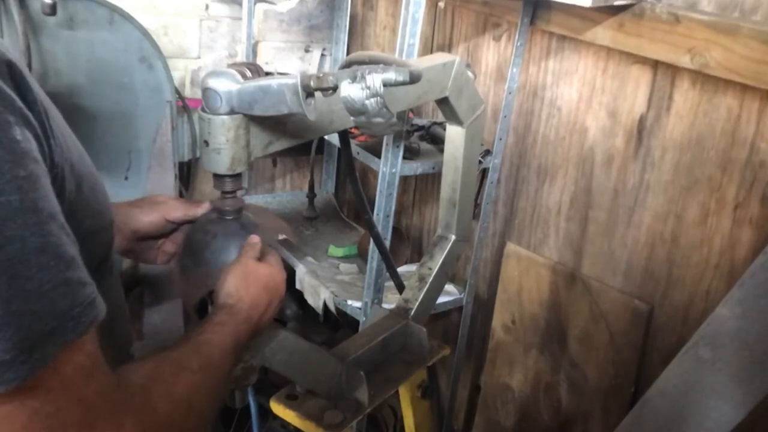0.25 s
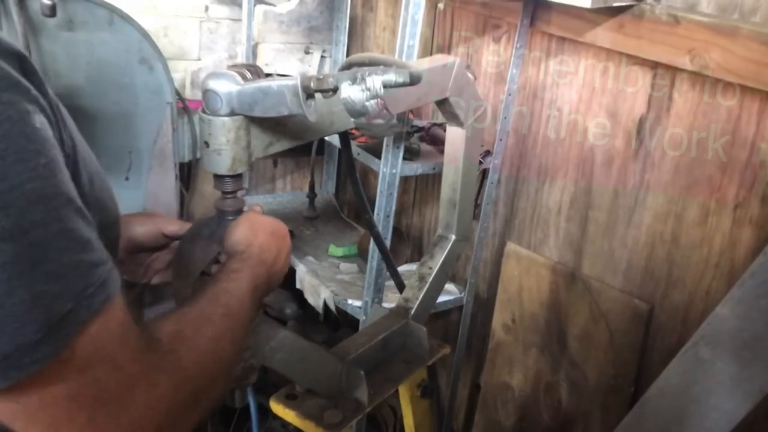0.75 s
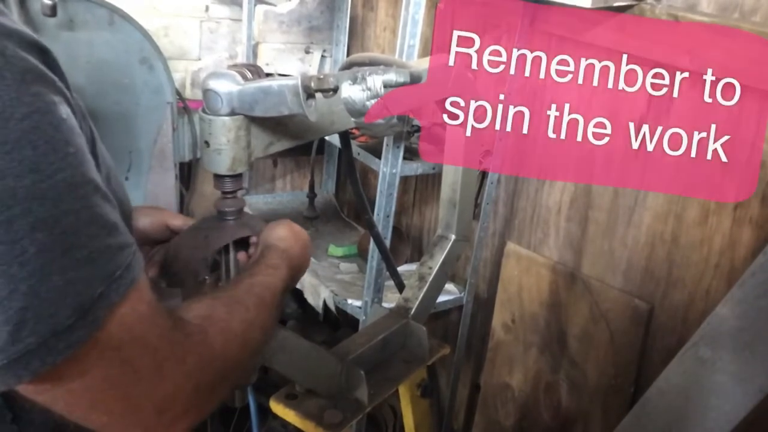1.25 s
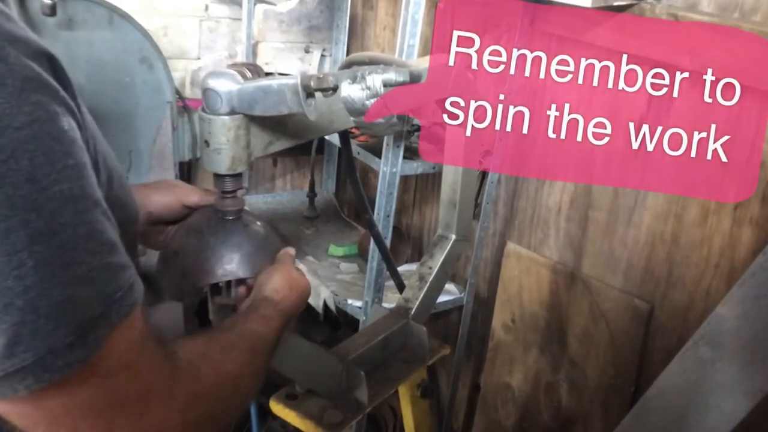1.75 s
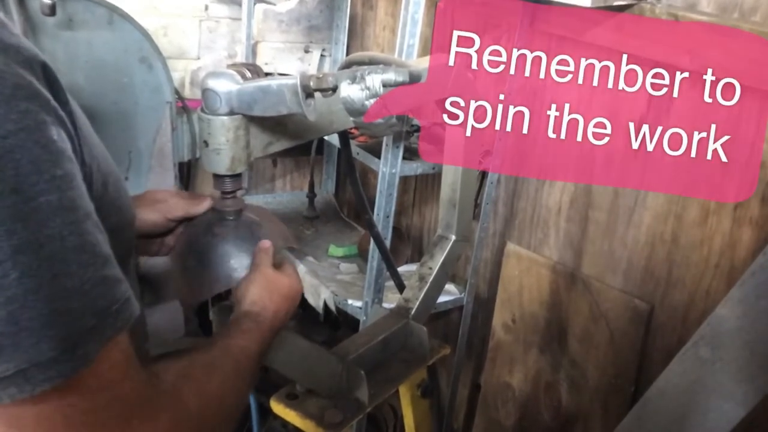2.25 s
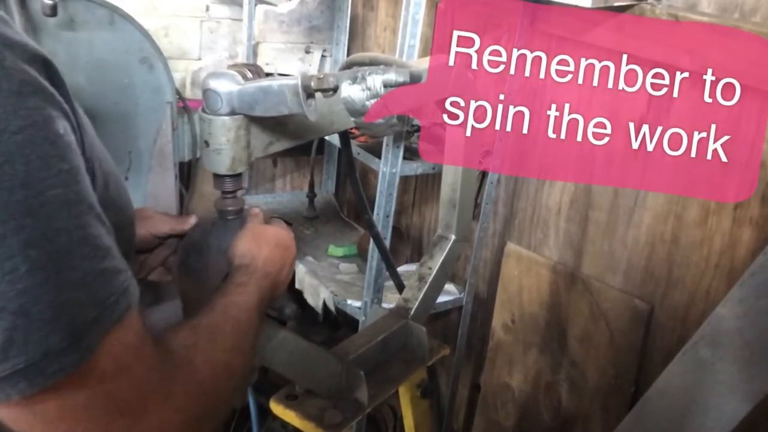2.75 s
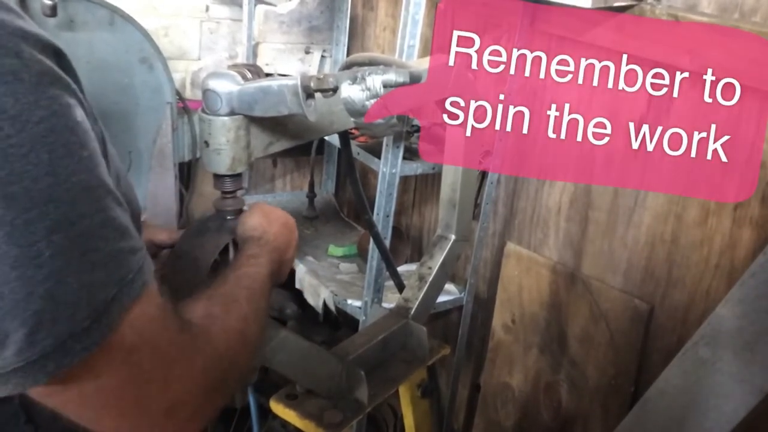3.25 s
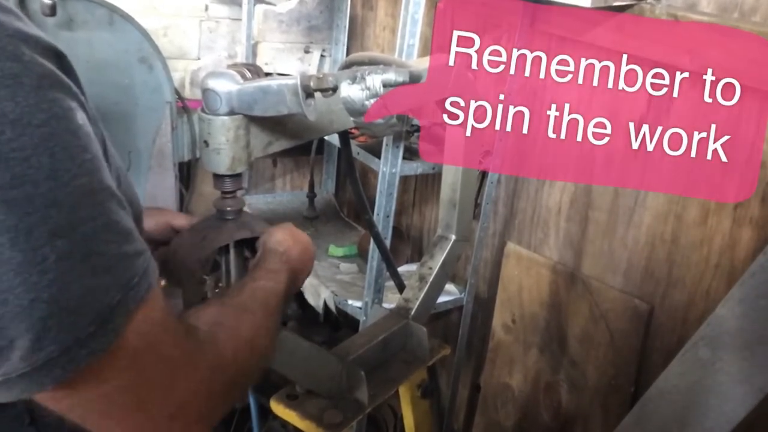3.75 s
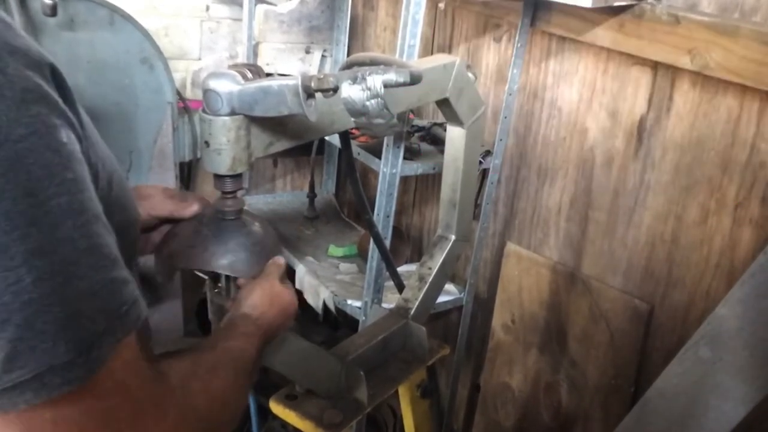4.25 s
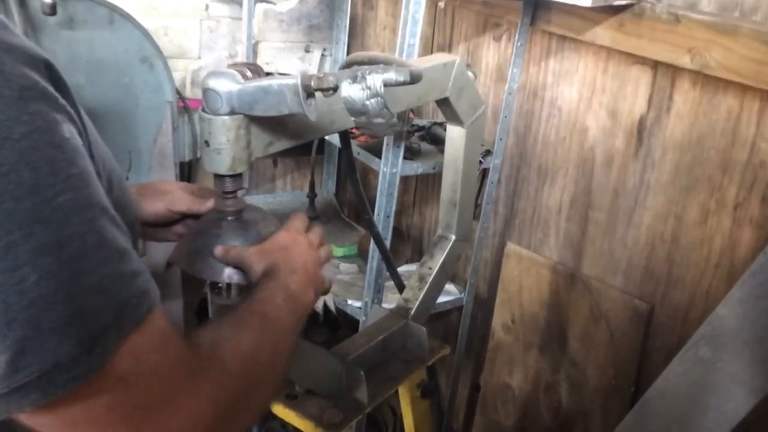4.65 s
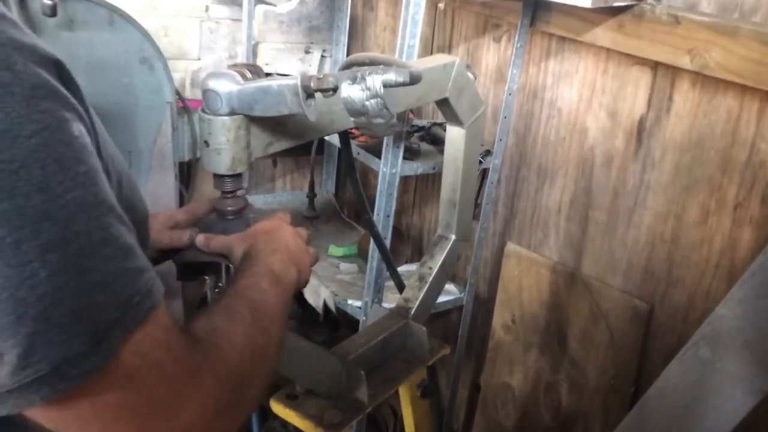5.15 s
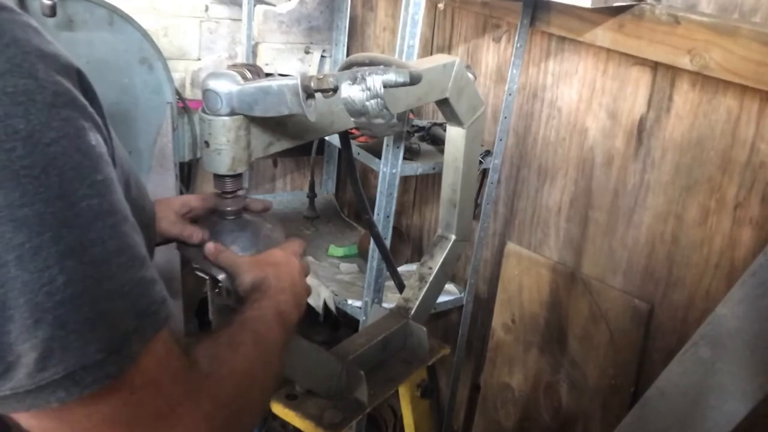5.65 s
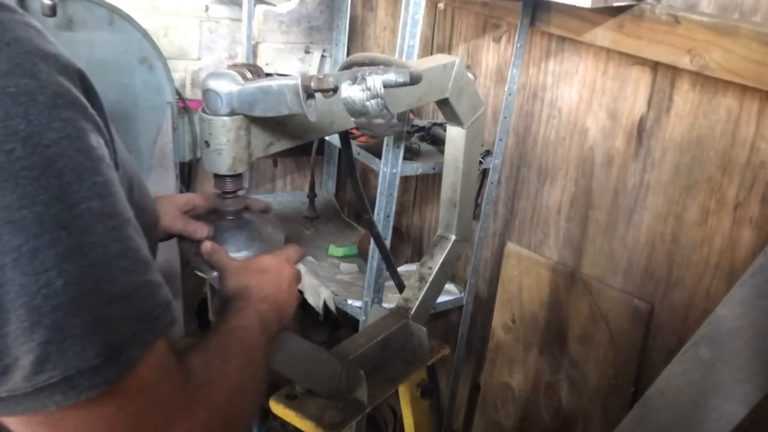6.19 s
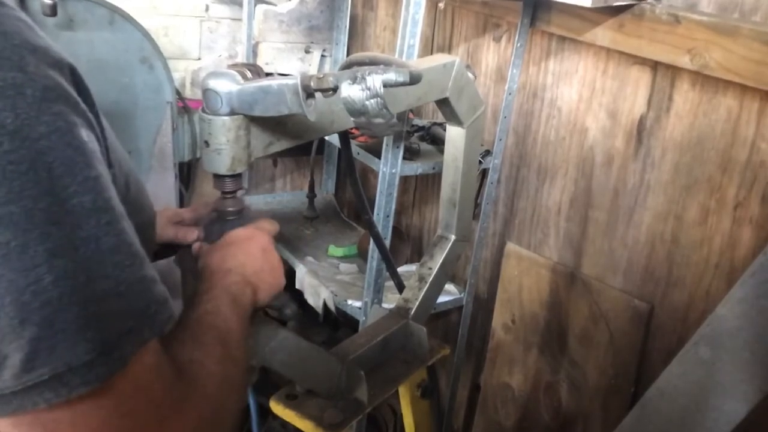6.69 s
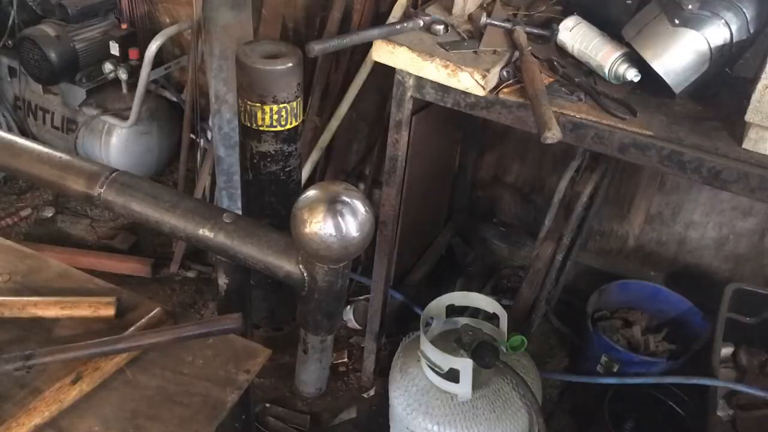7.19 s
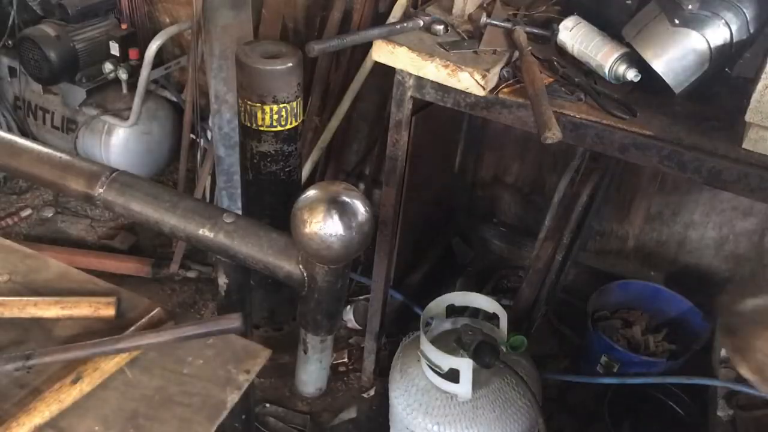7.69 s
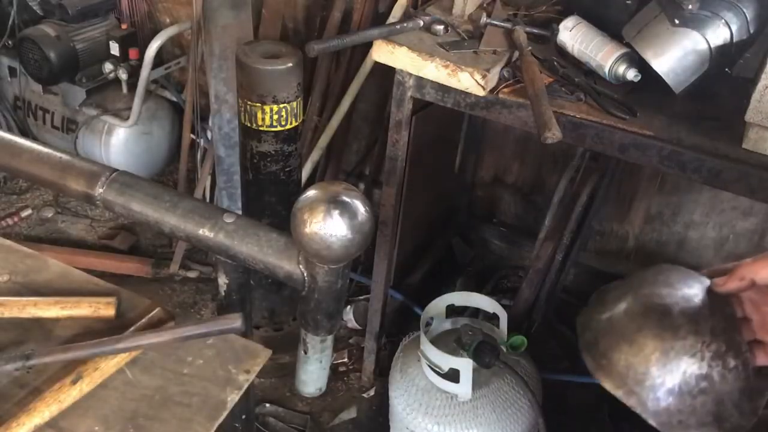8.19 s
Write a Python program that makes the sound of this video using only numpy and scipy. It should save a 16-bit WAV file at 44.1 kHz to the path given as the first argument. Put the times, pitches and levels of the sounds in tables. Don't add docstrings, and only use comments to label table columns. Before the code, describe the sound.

Close, slightly overloaded sound of rapid steel-on-steel hammering, nearly a continuous buzz, with bright ringing, piercing high rattle and irregular hollow thumps as the work is turned. A piston compressor rumbles underneath, and short wooden-shed reflections surround it. The racket ends with a hard cut; a much quieter shed follows, with faint leaking air, soft thuds and scuffs of feet, a small clink and light knocks on metal.

```python
import sys
import numpy as np
from scipy import signal
from scipy.fft import rfft, irfft, next_fast_len
from scipy.io import wavfile
from scipy.ndimage import uniform_filter1d, map_coordinates

SR = 44100
rng = np.random.default_rng(int(sys.argv[2]) if len(sys.argv) > 2 else 0)


def volts_from_db(level):
    exponent = np.asarray(level, float) / 20
    return 10 ** exponent


def materialize(psi):
    bounded = np.clip(np.atleast_2d(psi).T, -1, 1)
    quanta = np.round(bounded * 32767).astype(np.int16)
    wavfile.write(sys.argv[1], SR, quanta)


N = 371755


def unit(x):
    return x / np.sqrt(np.mean(x ** 2, axis=-1, keepdims=True) + 1e-20)


def along(points, hz):
    f, v = np.transpose(points)
    return np.interp(np.log(hz + 1), np.log(f + 1), v)


def curves(rows, s):
    knots, *cols = np.transpose(rows)
    return [np.interp(s, knots, c) for c in cols]


def wobble(rate):
    knots = rng.standard_normal(int(N * rate / SR) + 4)
    return map_coordinates(knots, [np.arange(N) * rate / SR])


def filtered(x, response):
    m = next_fast_len(x.shape[-1] + 8192)
    spectrum = rfft(x, m) * response(np.fft.rfftfreq(m, 1 / SR))
    return irfft(spectrum, m)[..., :x.shape[-1]]


def band(lo_hz, hi_hz):
    return lambda f: 1 / (1 + (lo_hz / (f + 1)) ** 4) / (1 + (f / hi_hz) ** 4)


def laid(rows, s):
    at = SR + np.round(np.asarray(s) * SR).astype(int)[:, None] + np.arange(rows.shape[1])
    return np.bincount(at.ravel(), rows.ravel(), N + 2 * SR)[SR:SR + N]


def rings(modes, part_db, t, scatter_db, wander):
    out = 0
    for hz, width_hz, db in modes:
        size, bend, phase = rng.standard_normal((len(part_db), 3, 1)).transpose(1, 0, 2)
        swing = np.sin(2 * np.pi * (hz * (1 + wander * bend) * t + phase))
        strength = volts_from_db(db + part_db[:, None] + scatter_db * size)
        out = out + strength * swing * np.exp(-np.pi * width_hz * t)
    return out


# first blow in seconds, that blow in dB, the blows after it in dB.
GRIP_CHANGES = [(-0.0026, -9.5, -15), (0.1567, -11.5, -13), (0.3377, -14, -14.5), (0.5241, -10.5, -14.5),
                (0.766, -11, -12.5), (1.0506, -11.5, -11), (1.2934, -9.5, -14), (1.5046, -10, -15),
                (1.668, -7.5, -13.5), (1.8654, -20, -13.5), (2.0343, -8, -13.5), (2.3036, -14.5, -13.5),
                (2.4706, -12, -13.5), (2.7418, -12, -12), (3.1493, -12, -11), (3.3872, -12.5, -11.5),
                (3.5898, -11.5, -13.5), (3.76, -10.5, -12), (3.9356, -9.5, -12.5), (4.143, -12, -12.5),
                (4.3617, -12.5, -14.5), (4.6477, -13.5, -13.5), (4.9155, -9.5, -14.5), (5.212, -12, -12.5),
                (5.5022, -14, -13), (5.8524, -12.5, -14.5), (6.036, -20, -13.5), (6.2513, -13.5, -12.5),
                (6.5351, -12, -18), (6.7031, -14, -12)]
# time in
# seconds, loss in dB.
SLIPPED_BLOWS = [(0.1, 4), (0.549, 5.5), (1.025, 7), (1.478, 4), (1.643, 6.5), (1.95, 4.5), (2.275, 4.5),
                 (3.095, 4), (3.359, 6), (3.6215, 4), (3.679, 2), (3.885, 5), (4.199, 3), (4.412, 5),
                 (4.73, 1.5), (4.836, 4), (4.863, 8), (5.261, 4.5), (5.476, 11.5), (5.582, 6), (5.636, 2),
                 (5.742, 4.5), (5.823, 5), (6.063, 8), (6.836, -3), (6.915, 1), (6.946, -4), (6.968, 8),
                 (6.991, 4), (7.016, 7)]


def blows():
    stroke_s = .0266
    scatter_db, rebound = 1.3, .6
    late_per_db, uneven = .012, .03
    last_blow = (7.048, -23, -23)
    first_s, first_db, rest_db = np.transpose(GRIP_CHANGES + [last_blow])
    first = np.append(0, np.cumsum(np.round(np.diff(first_s) / stroke_s))).astype(int)
    k = np.arange(first[-1] + 1)
    luck, pace = rng.standard_normal((len(k), 2)).T
    off_db = scatter_db * (luck - rebound * np.roll(luck, 1))
    even_s = np.interp(k, first, first_s)
    for s, loss_db in SLIPPED_BLOWS:
        off_db[np.abs(even_s - s).argmin()] = -loss_db
    usual_db = rest_db[np.searchsorted(first, k, side="right") - 1]
    off_db[first] = first_db - rest_db
    travel = np.cumsum(1 - late_per_db * off_db + uneven * pace)
    return np.interp(travel, travel[first], first_s), usual_db + off_db


# time in seconds, die in dB, crown in dB, piston in dB.
TURNING = [(0.0, -7.5, 5, 0.5), (0.54, -5.5, -9.5, 6.5), (0.81, -0.5, -3, 2.5), (1.08, -0.5, -3, 7),
           (1.62, -6, 2.5, 5), (2.16, -8.5, 3.5, -1.5), (2.43, -10, -0.3, 4), (2.7, -8.5, -7, 10.5),
           (2.97, -3.5, 2.5, -4.5), (3.24, -0.5, 4, -2.5), (3.6, -3, 3, -0.5), (4.05, -7, 5.5, 8),
           (4.4, -6, 2, 1), (4.86, -5.5, 6, 2.5), (5.4, -3, -10, 4.5), (5.94, -5, -2.5, -5),
           (6.48, -9, 0.5, 0.5), (7.02, -7.5, 5, 1.5)]
# frequency in Hz, width in Hz, level in dB.
SHELL_MODES = [(2920, 57, 2), (3260, 35, 0.5), (4430, 61, 5), (4660, 55, 1.5)]
# frequency in Hz, width in Hz, level in dB.
DIE_MODES = [(6405, 40, 6), (6443, 30, 10), (6485, 40, 5)]
# frequency in Hz, width in Hz, level in dB.
CROWN_MODES = [(7730, 50, 0), (8430, 50, 1), (8670, 50, 2), (8850, 40, 5)]
# frequency in Hz, width in Hz, level in dB.
PISTON_MODES = [(14730, 50, 6), (14812, 24, 13), (14900, 50, 7)]
# centre in seconds, half length in seconds,
# frequency in Hz, level in dB.
LOOSE_PATCHES = [
    (2.995, .055, 2320, 13),
    (3.2, .15, 1860, 8),
    (3.17, .12, 2840, 9),
    (3.9, .05, 1100, 8),
    (5.34, .035, 4750, 7),
    (5.665, .015, 2330, 9),
    (5.665, .015, 3450, 5),
    (6.885, .07, 8850, 13),
]
# frequency in Hz, density in dB per Hz.
RATTLE_SPECTRUM = [(290, -23), (500, -10), (1090, -6), (1660, -6), (5120, -8.5), (6470, -2), (7380, -7.5),
                   (10500, -9), (14900, -4), (15800, 4.5), (16500, -40.5)]


def clang(s, clang_db):
    t = np.arange(2048) / SR
    die_db, crown_db, piston_db = curves(TURNING, s)
    steel = rings(SHELL_MODES, 0 * s - 4, t, scatter_db=4.0, wander=.012)
    steel += rings(CROWN_MODES, crown_db, t, scatter_db=4.5, wander=.01)
    steel += rings(DIE_MODES, die_db, t, scatter_db=7.5, wander=0.0036)
    piston_db = piston_db - 2 + 1.8 * rng.standard_normal(len(s))
    piston = rings(PISTON_MODES, piston_db, t, scatter_db=5, wander=0.0011)
    for at, half, hz, db in LOOSE_PATCHES:
        patch_db = -12 * ((s - at) / half) ** 4
        steel += rings([(hz, 45, db)], patch_db, t, scatter_db=2.5, wander=0.002)
    jitter = rng.standard_normal((2,) + steel.shape)
    chatter, rebound = unit(uniform_filter1d(jitter, size=130))
    luck = rng.standard_normal((len(s), 3, 1)).transpose(1, 0, 2)
    ring_rise = 1 - np.exp(-t / (.0005 * np.exp(.9 * luck[0])))
    steel = (steel * volts_from_db(2.5 * chatter) + piston * volts_from_db(3 * rebound)) * ring_rise
    rattle_rise = 1 - np.exp(-t / (.0003 * np.exp(.9 * luck[1])))
    rattle = rng.standard_normal(steel.shape) * volts_from_db(1.3 * chatter) * rattle_rise * volts_from_db(-60 * t / 0.16)
    tint = unit(uniform_filter1d(rng.standard_normal((len(s), 64)), size=7))
    colour = lambda f: volts_from_db(along(RATTLE_SPECTRUM, f) + 2.76 * tint[:, (f * 126 / SR).astype(int)])
    blow = unit(steel.ravel()).reshape(steel.shape) + volts_from_db(0.5) * unit(filtered(rattle, colour))
    reseat_s = 0.012 + 0.001 * luck[2]
    blow *= 1 - 0.58 / (1 + np.exp((reseat_s - t) / 0.00079))
    blow /= np.sqrt(np.mean(blow[:, :800] ** 2, axis=1, keepdims=True))
    return laid(volts_from_db(clang_db - 3.0)[:, None] * blow, s)


def tick(s):
    t = np.arange(1024) / SR
    crack = unit(filtered(rng.standard_normal((len(s), len(t))), band(11500, 17000)))
    size_db = -24.5 + 3 * rng.standard_normal((len(s), 1))
    return laid(volts_from_db(size_db - 60 * t / .05) * crack, s)


# first blow in seconds, last blow in seconds,
# thump peak in dB, one blow in so many that finds the dome lifted.
FLAT_STRETCHES = [(0.1, 0.16, -5.5, 2), (0.205, 0.52, -7, 4), (1.13, 1.24, -5, 4), (1.32, 1.48, -3.5, 2),
                  (1.59, 1.59, -8, 2), (1.745, 1.745, -2, 2), (1.92, 1.92, -8.5, 2),
                  (2.035, 2.245, -5.5, 3), (2.305, 2.84, -7.5, 30), (2.415, 2.525, -6, 2),
                  (2.55, 2.635, -5.5, 3), (2.66, 2.72, -9, 30), (3.86, 3.89, -10.5, 30),
                  (4.09, 4.145, -6.5, 2), (4.225, 4.36, -4.5, 3), (4.41, 4.49, -5, 30),
                  (4.57, 4.57, -5.5, 2), (4.65, 4.705, -4, 2), (4.915, 5.61, -3.5, 14),
                  (5.85, 5.905, -3.5, 30), (6.035, 6.09, -2, 30), (6.14, 6.25, -6, 2),
                  (6.38, 6.46, -6.5, 2), (6.457, 6.595, -4.5, 2), (6.70, 6.70, -6, 2),
                  (6.81, 6.81, -12.5, 2), (6.965, 7.05, -5.5, 30)]


def flat_blows(s):
    peak_db = np.full(len(s), np.nan)
    for first_s, last_s, db, lifted in FLAT_STRETCHES:
        first, last = np.abs(s - first_s).argmin(), np.abs(s - last_s).argmin()
        k = np.arange(first, last + 1)
        peak_db[k[(k - first + 1) % round(lifted) > 0]] = db
    peak_db += 1.3 * rng.standard_normal(len(s))
    flat = ~np.isnan(peak_db)
    return s[flat], peak_db[flat]


# delay in ms, signed share of the direct shove.
WALL_ECHOES = [(1.36, -0.12), (2.13, 0.19), (3.08, -0.28), (3.65, 0.11), (5.83, -0.17), (9.32, 0.16),
               (11.09, 0.39), (13.22, -0.21), (14.56, 0.25), (15.26, -0.16), (16.39, -0.12), (20.93, 0.16)]


def push():
    ms = np.arange(1300) / SR * 1000 - 2
    swell = lambda u: np.exp(-((u + .1) / np.where(u < -.1, .52, .9)) ** 2)
    chirp = lambda u: swell(u) * np.cos(2 * np.pi * (1.373 * u - .34 * u * u))
    return chirp(ms) + 1.05 * sum(share * chirp(ms - late) for late, share in WALL_ECHOES)


# frequency in Hz, width in Hz, level in dB.
FRAME_MODES = [(844, 44, -27.5), (976, 64, -27.5), (1130, 13, -32.5), (1230, 60, -37.5), (2214, 120, -21.5)]


def thump(s, clang_db):
    square_s, square_db = flat_blows(s)
    square = laid(volts_from_db(square_db - 2.5)[:, None] * push(), square_s - .0008)
    apart = np.abs(s[:, None] - square_s)
    near_db, apart = square_db[apart.argmin(axis=1)], apart.min(axis=1)
    glancing = apart > .005
    weak_db = -13.5 + .4 * near_db - 30 * np.minimum(apart, .25)
    weak_db += 0.51 * (clang_db - clang_db.mean()) + 2.7 * rng.standard_normal(len(s))
    weak = laid((glancing * volts_from_db(weak_db))[:, None] * push(), s - .0009)
    t = np.arange(600) / SR
    air = np.cos(2 * np.pi * 240 * t) + 1.1 * rng.standard_normal((len(s), len(t)))
    puff = np.exp(-((t - .006) / 0.003) ** 2) * air
    exhaust = filtered(laid(puff, s - .006), band(120, 450))
    frame = lambda f: 1 + sum(volts_from_db(db) * 1j * f * c / (c * c - f * f + 1j * f * w) for c, w, db in FRAME_MODES)
    return filtered(square + weak, frame) + volts_from_db(-36.0) * unit(exhaust)


# multiple of the stroke rate, rms level in dB.
INTAKE_ORDERS = [(3, -53.5), (4, -53.5), (8, -54.5), (10, -60), (11, -51.5), (12, -54), (13, -39),
                 (14, -38), (15, -38), (16, -52), (18, -48.5)]
# frequency in Hz, density in dB per Hz.
RUMBLE_SPECTRUM = [(15, -36.5), (25, -10.5), (59, -6), (97, -3.5), (139, -8.5), (339, -5), (412, -7),
                   (700, -11), (910, -37), (1540, -120)]


def compressor():
    stroke_hz, motor_hz = 24.2548, 51.22
    t = np.arange(N) / SR
    gulps = 0
    for k, db in INTAKE_ORDERS:
        gulps = gulps + volts_from_db(db + 1.7 * wobble(6)) * np.cos(2 * np.pi * k * stroke_hz * (t - .0025))
    motor = volts_from_db(-37.5 + .6 * wobble(1.5)) * np.sin(2 * np.pi * motor_hz * t)
    colour = lambda f: volts_from_db(along(RUMBLE_SPECTRUM, f)) / (1 + (42 / (f + 1)) ** 4)
    rumble = unit(filtered(rng.standard_normal(N), colour))
    return np.sqrt(2) * (gulps + motor) + volts_from_db(-35.5 + 0.5 * wobble(13)) * rumble


# frequency in Hz, decay time T60 in seconds.
SHED_DECAY = [(200, 0.12), (1500, 0.42), (6000, 0.37), (15000, 0.19)]


def shed(x, parts=1):
    out = np.zeros(N)
    for k in range(parts):
        hz, t, z = signal.stft(rng.standard_normal(SR // 3), SR, nperseg=256)
        decay = volts_from_db(-60 * t / along(SHED_DECAY, hz)[:, None])
        tail = signal.istft(z * decay, SR, nperseg=256)[1]
        a, b = k * N // parts, (k + 1) * N // parts
        late = np.pad(x[a:b], (130, 0))
        wet = signal.fftconvolve(late, tail / np.linalg.norm(tail))[:N - a]
        out[a:a + len(wet)] += wet
    return out


# frequency in Hz, density in dB per Hz.
LEAK_SPECTRUM = [(18, -30), (30, 6), (215, -0.5), (2120, -11), (3310, -5.5), (5040, -10), (6720, -3.5),
                 (7470, -7.5), (13300, -2), (16000, -3)]
# frequency in Hz, width in Hz, level in dB.
LEAK_WHISTLES = [(6280, 150, -3), (10700, 110, -8), (13900, 84, 0), (14640, 64.4, -5.5)]
# start in seconds, thud in dB, scuff in dB, decay time T60 in seconds.
FOOTFALLS = [(7.39, -47.5, -62, 0.15), (7.428, -57, -55, 0.12), (7.469, -45, -64, 0.11),
             (7.482, -60, -42, 0.1), (7.503, -39, -52, 0.15), (7.655, -56, -59, 0.13),
             (7.69, -64, -54, .06), (8.005, -66, -60, .15), (8.138, -45, -53.5, 0.14),
             (8.175, -54, -56, 0.07), (8.255, -52, -57.5, .1), (8.281, -53, -54, 0.2)]
# time in seconds, peak in dB.
DOME_TAPS = [
    (8.244, -41),
    (8.332, -31),
    (8.367, -35),
    (8.409, -33),
]
# frequency in Hz, width in Hz, level in dB.
TOOL_MODES = [(1520, 25, -53), (5600, 90, -55), (7800, 40, -53), (8600, 30, -54), (9800, 60, -53),
              (11500, 40, -56)]


def quiet_shed():
    whistle = lambda f: 1 + sum(.5 * volts_from_db(db) / (1 + ((f - c) / w) ** 2) for c, w, db in LEAK_WHISTLES)
    leak = unit(filtered(rng.standard_normal(N), lambda f: volts_from_db(along(LEAK_SPECTRUM, f)) * whistle(f)))
    s, thud_db, scuff_db, t60 = np.transpose(FOOTFALLS)
    t = np.arange(SR // 5) / SR
    fade = volts_from_db(-60 * t / t60[:, None]) * (1 - np.exp(-t / 0.0022))
    noise = rng.standard_normal((len(s), 2, len(t)))
    thud = volts_from_db(thud_db + 1.0)[:, None] * unit(filtered(noise[:, 0], band(85, 276))) * fade
    scuff = volts_from_db(scuff_db + 1.5)[:, None] * unit(filtered(noise[:, 1], band(450, 2300))) * fade
    tap_s, tap_db = np.transpose(DOME_TAPS)
    taps = laid(volts_from_db(tap_db)[:, None] * push(), tap_s - .002)
    clink_s = 8.155
    clink = laid(rings(TOOL_MODES, np.zeros(1), t, scatter_db=0, wander=0), [clink_s])
    snap = laid(volts_from_db(-38 - 60 * t / .08) * filtered(noise[:1, 1], band(6500, 12000)), [clink_s])
    close = snap + laid(thud + scuff, s) + filtered(taps, band(500, 1100)) + clink
    return volts_from_db(-53) * leak + close + volts_from_db(-6) * shed(close)


def scene():
    s, clang_db = blows()
    steel = clang(s, clang_db) + tick(s)
    shove = thump(s, clang_db)
    room = volts_from_db(-4) * shed(steel, parts=40) + volts_from_db(-7) * shed(shove, parts=24)
    working = steel + shove + room + compressor()
    change_s = 7.0688
    before = np.clip((change_s - np.arange(N) / SR) / .0012, 0, 1)
    return (before * working + (1 - before) * quiet_shed())[None]


def top_cut(x):
    return signal.sosfilt(signal.butter(12, 16810, fs=SR, output="sos"), x)


def record(dry):
    x = dry / (1 + np.abs(dry / 1.1) ** 6) ** (1 / 6)
    x = filtered(x, lambda f: 1 / (1 + (f / 15720) ** 160))
    x = x / (1 + np.abs(x) ** 30) ** (1 / 30)
    return top_cut(x)


dry = scene()
out = record(dry)
materialize(out)
```